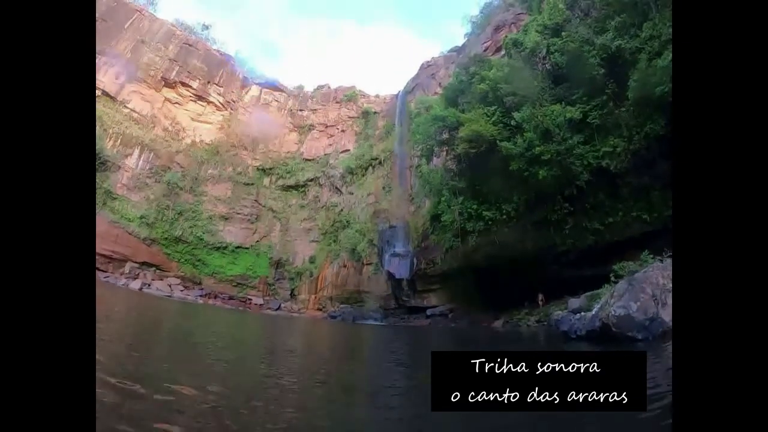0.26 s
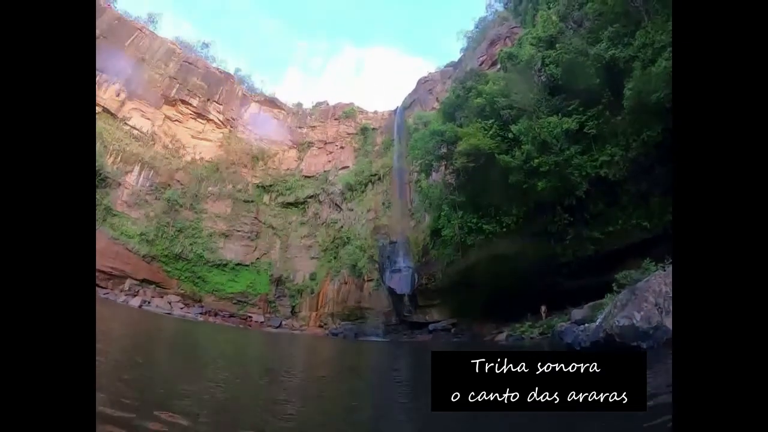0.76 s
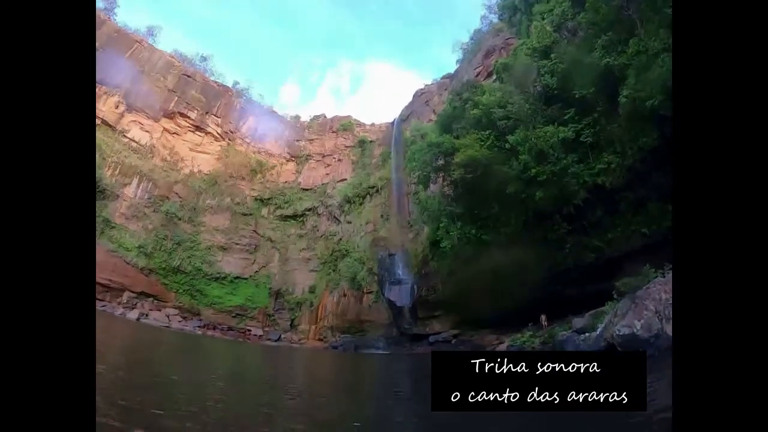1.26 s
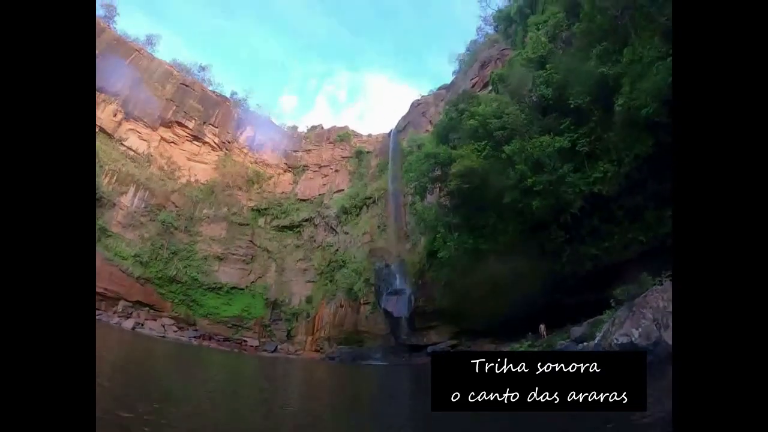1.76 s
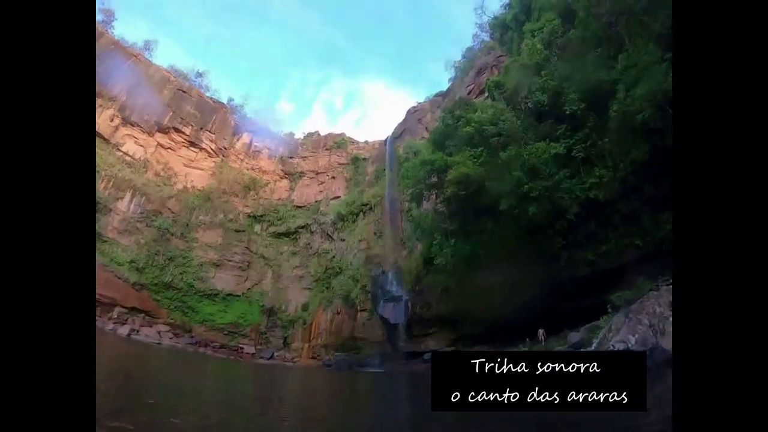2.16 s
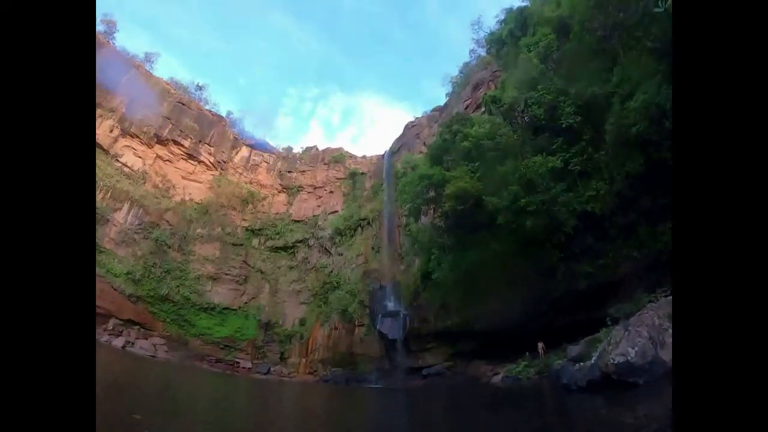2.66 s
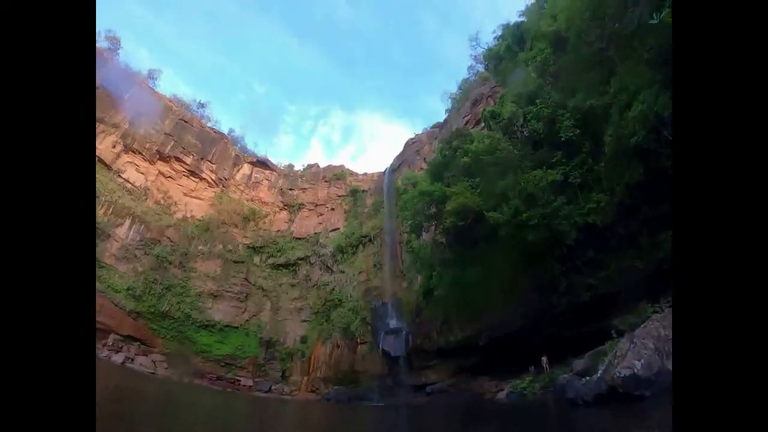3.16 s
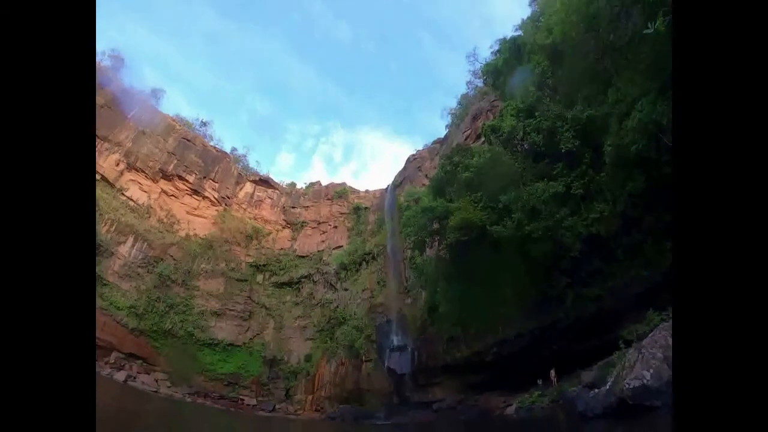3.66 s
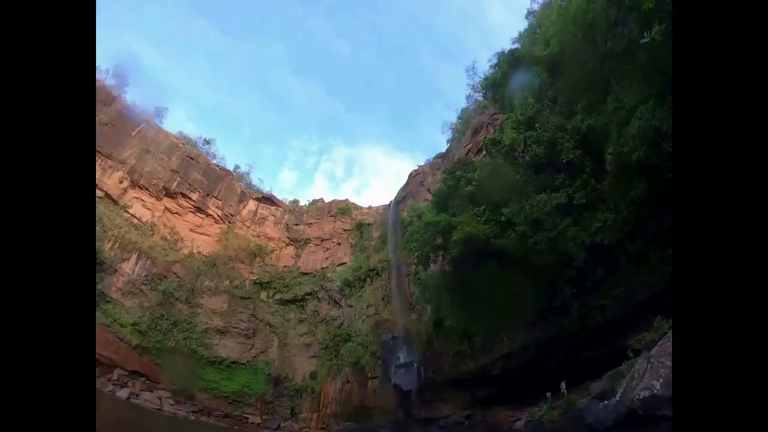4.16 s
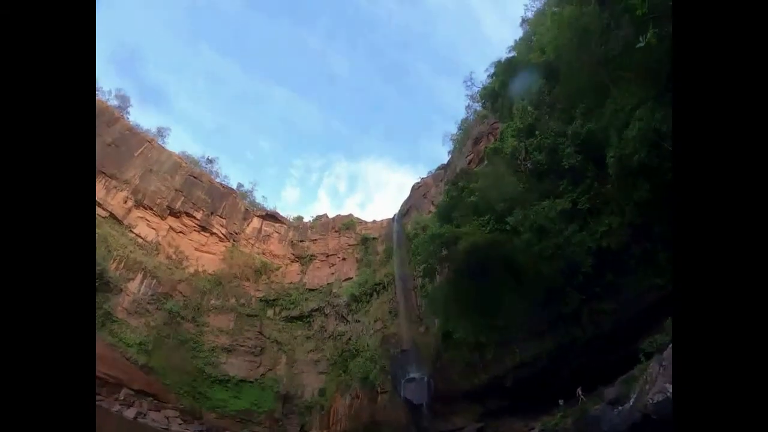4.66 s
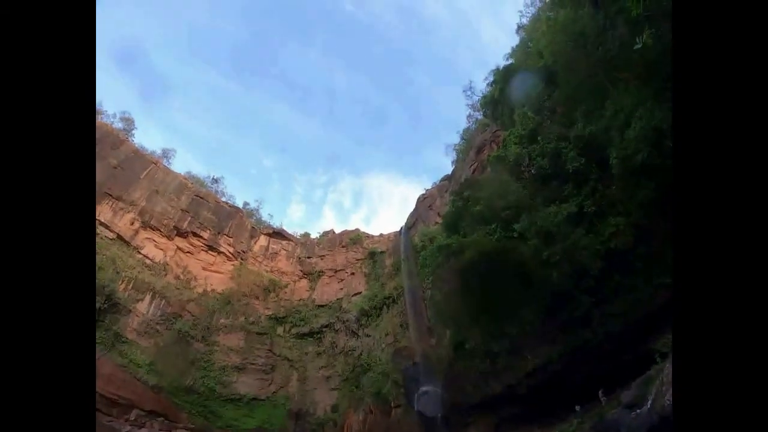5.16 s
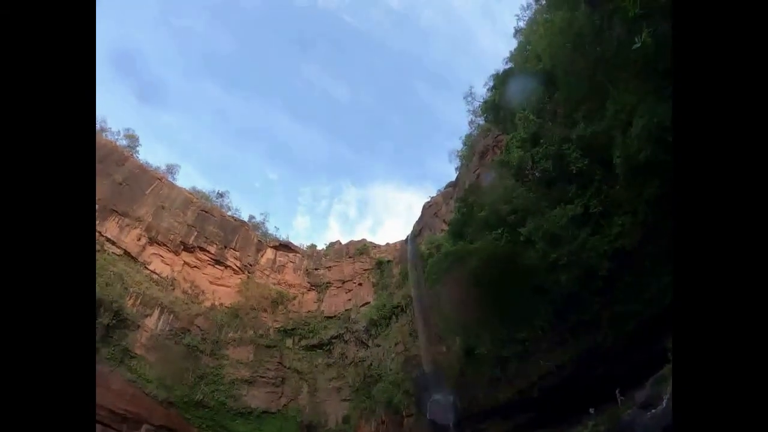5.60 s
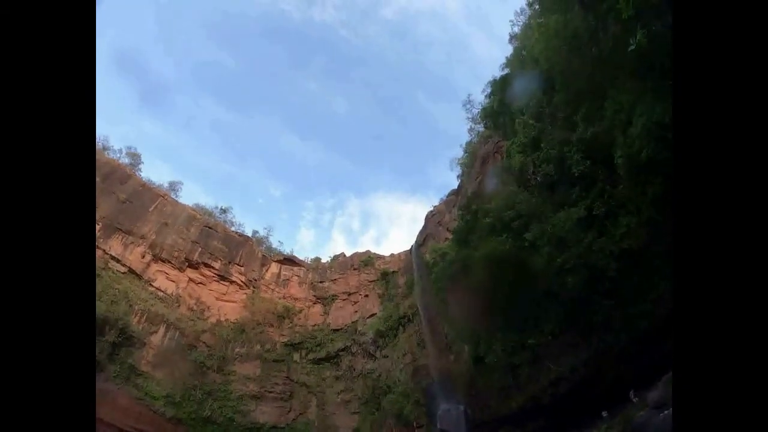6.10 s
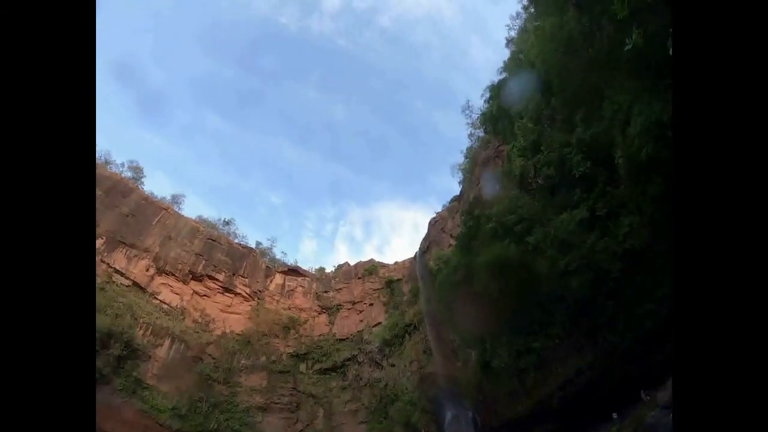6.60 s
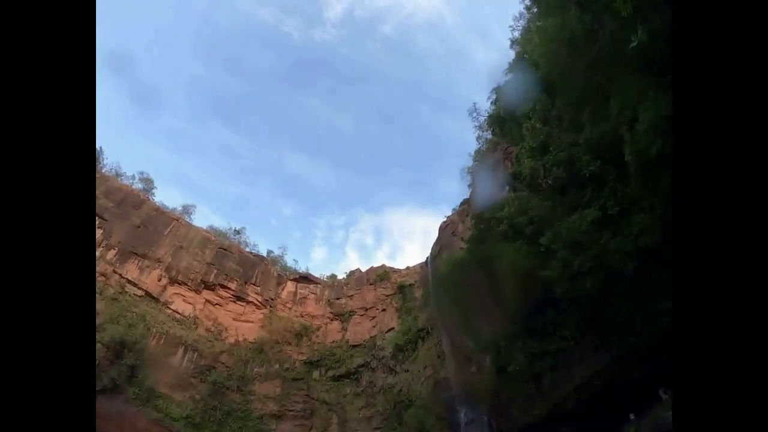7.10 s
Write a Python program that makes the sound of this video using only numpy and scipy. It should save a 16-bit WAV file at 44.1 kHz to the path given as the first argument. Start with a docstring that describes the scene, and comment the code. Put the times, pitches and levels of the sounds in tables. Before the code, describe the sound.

Close handling noise leads: irregular dull taps, rubbing and small plastic clicks, with a sudden crack just after one second. Behind it, a distant flock of macaws makes wavering chatter, brief thin whistles and three hoarse squawks, softened by short cliff echoes. A faint smooth waterfall lies underneath. Taps weaken after four seconds, leaving birds clearer, with a few low jolts near the end.

```python
"""Fingers tap on a hand-held camera case: each touch ticks on the shell and rings the case low.
Macaws squawk, a buzz through moving throat resonances, and whistle as bent, fluttering tones in a
rock amphitheatre, where noise tails echo them. Behind lie the shaped noise of a thin waterfall and its
spray, and a far flock of many overlapping calls. The hand rubs and jolts; the mount snaps once."""
import sys
import numpy as np
from scipy import signal
from scipy.fft import rfft, irfft, next_fast_len
from scipy.io import wavfile
from scipy.ndimage import uniform_filter1d

SR = 44100
rng = np.random.default_rng(int(sys.argv[2]) if len(sys.argv) > 2 else 0)


def pcm_store(signal):
    """Save signal as 16-bit PCM."""
    levels = np.round(np.clip(np.atleast_2d(signal), -1, 1) * 32767)
    wavfile.write(sys.argv[1], SR, levels.astype(np.int16).T)


N = 323694
TIME = np.arange(N) / SR  # s
OPPOSED = np.array([[1], [-1]])  # left and right in opposite polarity

# restlessness of the hand: start_s, level_db
GRIP_CURVE = [(0.0, -71), (0.26, -76.5), (0.63, -71.5), (0.82, -87), (1.06, -74), (1.29, -65), (1.61, -80),
              (1.94, -80), (2.37, -65), (2.66, -73), (2.95, -68.5), (3.68, -76), (4.23, -57.5),
              (4.62, -70.5), (5.76, -64.5), (6.09, -74), (6.64, -70.5), (7.34, -83)]


def from_db(db):
    """Decibels to gain."""
    return 10 ** (np.asarray(db) / 20)


def rms_one(x):
    """Scale to unit power."""
    return x / np.sqrt(np.mean(x ** 2) + 1e-20)


def in_time(rows, t_s=TIME):
    """Interpolate each column of a curve at the times t_s."""
    s, *columns = np.transpose(rows)
    return [np.interp(t_s, s, column) for column in columns]


def drift(rate_hz, size=N):
    """Random wander of unit spread: noise through two equal low-pass poles at rate_hz."""
    r = np.exp(-2 * np.pi * rate_hz / SR)
    run_in = int(10 * SR / rate_hz)
    noise = rng.standard_normal(size + run_in)
    return rms_one(signal.lfilter([1], [1, -2 * r, r * r], noise))[run_in:]


def coloured(points):
    """Unit-power noise with the given spectral density, falling away below its first point."""
    hz, db = np.transpose(points)
    size = next_fast_len(N, real=True)
    f = np.maximum(np.fft.rfftfreq(size, 1 / SR), 1)
    gain = from_db(np.interp(np.log(f), np.log(hz), db)) * np.minimum(f / hz[0], 1)
    return rms_one(irfft(rfft(rng.standard_normal(size)) * gain, size)[:N])


def ring(clicks, hz, t60_s):
    """Decaying resonator: a unit click starts a sine of height 1."""
    r = from_db(-60 / (t60_s * SR))
    w = 2 * np.pi * hz / SR
    return signal.lfilter([0, np.sin(w)], [1, -2 * r * np.cos(w), r * r], clicks + 1e-18)


def resonance(hz, width_hz):
    """Filter coefficients of a two-pole resonance with gain near 1 on top."""
    r = np.exp(-np.pi * width_hz / SR)
    zeros = np.array([1, 0, -1]) * (1 - r * r) / 2
    return zeros, [1, -2 * r * np.cos(2 * np.pi * hz / SR), r * r]


def resonate_twice(x, hz, width_hz):
    """Two equal resonances in series."""
    zeros, poles = resonance(hz, width_hz)
    return signal.lfilter(zeros, poles, signal.lfilter(zeros, poles, x))


def sweep(x, hz, width_hz, size=64):
    """A resonance whose centre moves, block by block."""
    state, out = np.zeros(2), np.zeros(len(x))
    for i in range(0, len(x), size):
        zeros, poles = resonance(hz[i], width_hz)
        out[i:i + size], state = signal.lfilter(zeros, poles, x[i:i + size], zi=state)
    return out


def add(out, s, x):
    """Mix x into out at time s."""
    i = max(int(s * SR), 0)
    out[..., i:i + x.shape[-1]] += x[..., :N - i]


def place(x, pan_db, lag_ms):
    """Stereo position: left is louder by pan_db and later by lag_ms."""
    t_ms = np.arange(len(x)) / SR * 1000
    left = np.interp(t_ms - lag_ms, t_ms, x)
    return np.array([left * from_db(pan_db / 2), x * from_db(-pan_db / 2)])


def cliffs(x, wet_db, build_s, t60_s=0.79):
    """Scattered rock echoes build up and die: a partly shared noise tail for each ear."""
    t = TIME[:SR]
    shape = from_db(-60 * t / t60_s) * (1 - np.exp(-t / build_s))
    echoes = shape * (rng.standard_normal((2, SR)) + 0.23 * rng.standard_normal(SR))
    tail = signal.fftconvolve(x, rms_one(echoes) / np.sqrt(SR), axes=1)[:, :N]
    return (x + from_db(wet_db) * tail) / np.sqrt(1 + from_db(2 * wet_db))


def whistle(length_s, pitches_hz, waver, flutter_db):
    """An arched note: the throat picks one overtone of a hoarse voice and leaves its neighbours faint."""
    u = np.linspace(0, 1, int(max(length_s, .01) * SR))
    # parabola through start, middle and end pitch
    arch_hz = np.polyval(np.polyfit([0, .5, 1], pitches_hz, 2), u)
    hz = arch_hz * (1 + waver * drift(194.3, len(u)))
    phase = 2 * np.pi * np.cumsum(hz) / SR
    hoarse = 1 + .15 * np.cos(phase / 4) + .25 * drift(300, len(u))
    swell = np.abs(np.sin(np.pi * u)) ** .25 * from_db(flutter_db * drift(40, len(u)))
    return rms_one(swell * hoarse * np.sin(phase))


def waterfall(level_db):
    """A smooth far wash: steady noise, part common to both ears and part opposed."""
    # spectra: pitch_hz, density_db
    wash_mid = [(300, -21), (530, -25), (855, -11.5), (1150, -20.5), (1310, -4.5), (1500, -15.5),
                (1630, -5), (1780, -9), (2400, -8.5), (2700, -1.5), (3490, -4.5), (4250, -15), (6400, -13),
                (9600, -15.5), (11500, -33), (15000, -23.5)]
    wash_side = [(180, -5), (300, -10.5), (515, -18.5), (738, -9), (1130, -16), (1670, -1), (2070, -36),
                 (3220, -0.5), (3980, -29), (5010, -2.5), (6620, -28), (7180, -23), (8600, -21.5),
                 (9960, -59), (15000, -68)]
    mid = from_db(5.5) * coloured(wash_mid)
    side = from_db(4.0) * coloured(wash_side)
    return from_db(level_db) * (mid + side * OPPOSED)


def spray():
    """Fine drops hiss at the foot of the fall, louder as the camera tilts up."""
    # spectrum: pitch_hz, density_db
    hiss_colour = [(5500, -17), (6100, -6), (6600, 2), (7300, -17), (8600, -8.5), (9300, -6), (10400, -15),
                   (11500, -27), (15000, -14.5)]
    # level before the overall gain: start_s, level_db
    hiss_level = [(0, -95), (3.8, -83), (5.2, -74), (6.2, -70.5), (7.34, -72)]
    hiss = coloured(hiss_colour) + 0.49 * coloured(hiss_colour) * OPPOSED
    return from_db(in_time(hiss_level)[0] + 8.0) * hiss


def far_flock(mean_db=-50.5, swing=1.33, count=110):
    """Many far calls overlap into a wavering band, over chatter blurred by the cliffs."""
    # blurred chatter: pitch_hz, density_db
    blur_colour = [(900, -17.5), (1300, -12), (1630, -2), (1850, -3.5), (2150, 0), (2420, -5.5),
                   (2700, 3.5), (3100, -18), (3500, -2.5), (3800, -10.5), (4150, -24), (5500, -34.5)]
    # course of the chatter: start_s, level_db (only its departure from the mean counts, times swing)
    chatter = [(0.0, -53), (0.61, -56), (0.9, -50.5), (2.02, -56), (3.64, -55), (4.0, -51), (4.25, -52.5),
               (4.97, -51.5), (5.3, -51), (6.6, -54.5), (7.01, -53.5), (7.34, -52)]
    chatter_db, = in_time(chatter)
    level_db = mean_db + swing * (chatter_db - chatter_db.mean())

    calls = np.zeros((2, N))
    for when, length, pitch, bend, side in rng.random((count, 5)):
        hz = 2100 + 1500 * pitch
        pitches_hz = hz * np.array([1 + 0.1296 * (bend - .5), 1, .97])
        note = whistle(0.0374 + 0.0976 * length, pitches_hz, waver=.012, flutter_db=6.5)
        add(calls, when * N / SR, place(note, 8 * (side - .5), lag_ms=0.33))
    calls = rms_one(cliffs(calls, wet_db=1.5, build_s=0.012))

    shared_blur = place(coloured(blur_colour), pan_db=-8.5, lag_ms=0.32)
    separate_blur = np.array([coloured(blur_colour), coloured(blur_colour)])
    blur = rms_one(shared_blur + separate_blur) * from_db(2.08 * drift(32.03))
    return from_db(level_db) * (from_db(-5.5) * blur + from_db(-8.5) * calls)


def far_cry():
    """One drawn-out call from beyond the rim: a few low harmonics that swell and fade."""
    # start_s, pitch_hz, level_db
    cry_curve = [(0, 430, -55), (.15, 424.6, -76), (.25, 433, -62.5), (.45, 431, -68), (.6, 433, -70),
                 (.75, 411, -83)]
    # multiple, level_db
    harmonics = [(2, -1.5), (3, -1.5), (4, -16)]
    hz, db = in_time(cry_curve)
    phase = 2 * np.pi * np.cumsum(hz * (1 + .018 * drift(30))) / SR
    cry = sum(from_db(db + g + 3.5 * drift(9)) * np.sin(k * phase) for k, g in harmonics)
    cry = cry * (TIME < cry_curve[-1][0])
    return cliffs(place(cry, pan_db=-6, lag_ms=0.13), wet_db=-15, build_s=0.011)


def grip(rub_db=3.5, rumble_db=-55.5, swell_db=6.5):
    """The shifting hand rubs on the case (resonant noise), rumbles the microphone and jolts it."""
    # start_s, level_db, pitch_hz
    jolt_rows = [(0.151, -41, 60), (1.078, -44, 64.5), (1.623, -45, 65), (2.625, -41, 60), (2.927, -50, 70),
                 (4.092, -39.5, 49.7), (5.936, -42, 39.3), (6.503, -41, 39.8), (6.736, -36.5, 41.6),
                 (6.828, -34, 50.5)]
    grip_db, = in_time(GRIP_CURVE)
    friction = rng.standard_normal(N) * from_db(swell_db * drift(22.22))
    rub = resonate_twice(friction, 185, 53) + from_db(-15.0) * resonate_twice(friction, 386, 86)

    # pitch_hz, density_db
    rumble_colour = [(20, 4.0), (40, -1.0), (70, -13.0), (110, -49), (400, -64), (2000, -102)]
    rumble = coloured(rumble_colour) * from_db(2.75 * drift(6.2))

    jolts = np.zeros(N)
    t = TIME[:SR // 5]
    for s, db, hz in jolt_rows:
        age = t / 0.011
        add(jolts, s, from_db(db) * age * np.exp(1 - age) * np.sin(2 * np.pi * hz * t))
    hand = from_db(grip_db + rub_db) * rms_one(rub) + from_db(rumble_db) * rumble + jolts
    return place(hand, pan_db=2.0, lag_ms=0)


def snap():
    """The mount slips and snaps: noise bursts that die in milliseconds, then a short ring."""
    # start_s, level_db, decay_s
    slips = [(1.308, -41.5, 0.0086), (1.3156, -27.5, 0.0089), (1.3184, -29, 0.0041), (1.323, -15.5, 0.0014),
             (1.3256, -34, 0.0058)]
    # pitch_hz, density_db
    crack_colour = [(300, -37), (1000, -13.5), (1500, -15), (2050, 0.5), (2600, -9), (3600, -1.5),
                    (4400, -18.5), (6300, -9.5), (7300, -30), (8600, -11.5), (10200, -20.5), (11000, -48),
                    (15000, -20)]
    force = sum(from_db(db) * (TIME >= s) * np.exp(-np.abs(TIME - s) / decay_s)
                for s, db, decay_s in slips)
    separate = np.array([coloured(crack_colour), coloured(crack_colour)])
    crack = force * (coloured(crack_colour) + 0.5 * separate)
    stop = np.zeros(N)
    add(stop, 1.329, from_db([-33]))
    return (crack + ring(stop, hz=1040, t60_s=0.057)) * from_db([[-1.5], [1.5]])


def light_touches(per_s=18, over_grip_db=15.5, spread_db=2.5, tick_db=-34, upper_db=-21):
    """Fingertips shift at uneven intervals, as strong as the hand is restless; rows like firm taps."""
    chance = rng.random((int(per_s * N / SR), 5))
    s = (np.arange(len(chance)) + chance[:, 0]) / per_s
    scatter_db = spread_db * np.sqrt(12) * (chance[:, 1:4].T - .5)
    thud_db = in_time(GRIP_CURVE, s)[0] + over_grip_db + scatter_db[0]
    # tick and upper mode are relative to the thud
    ticks_db = thud_db + tick_db + scatter_db[1]
    uppers_db = thud_db + upper_db + scatter_db[2]
    ring_hz = np.interp(chance[:, 4], [0, 1], [162.4, 216])
    t60_s = np.full(len(s), 0.1)
    return list(zip(s, thud_db, ticks_db, uppers_db, ring_hz, t60_s))


def taps(lead_s=0.0015, crack_s=0.003, low_cut_hz=138, grit=0.13, soft_db=-33):
    """Each touch ticks on the shell, then the case rings low, pitch and damping set by the grip."""
    # start_s, thud_db, tick_db, upper_mode_db, ring_hz, ring_t60_s
    firm_taps = [(.002, -31.5, -56.5, -47, 200, 0.14), (.017, -28.5, -66, -31, 193, 0.08),
                 (.147, -25.5, -54, -24.5, 186, 0.043), (0.416, -25.5, -55.5, -65, 196, 0.084),
                 (.533, -31.5, -56.5, -29.5, 206, 0.048), (.676, -37, -67.5, -55.5, 188, 0.087),
                 (0.745, -31.5, -68, -37, 198, 0.077), (1.074, -25, -58, -23, 208, .036),
                 (1.152, -44, -72, -42, 200, 0.036), (1.244, -29, -67, -42, 197, 0.06),
                 (1.412, -27, -56, -36, 200, 0.054), (1.511, -32.5, -64, -37, 192, 0.083),
                 (1.619, -27, -55.5, -29, 180, 0.097), (1.858, -24.5, -53.5, -34, 204, 0.089),
                 (1.984, -33, -60, -39, 193, 0.091), (2.121, -31, -52, -31, 202, 0.13),
                 (2.156, -34, -65, -40, 182, 0.045), (2.216, -41.5, -77, -68, 191, 0.052),
                 (2.29, -43, -73, -38, 200, .04), (2.307, -28, -67, -36, 195, 0.044),
                 (2.341, -35, -74, -38, 198, 0.18), (2.379, -36, -75, -41, 176, 0.074),
                 (2.481, -38.5, -66, -46, 210, 0.04), (2.587, -31, -57, -35, 185, .065),
                 (2.642, -23.5, -61, -30, 198, 0.046), (2.697, -35, -74, -44, 186, 0.059),
                 (2.801, -34, -78, -50, 202, 0.048), (2.836, -25.5, -55, -33, 201, 0.052),
                 (2.902, -41, -68, -41, 205, 0.23), (2.939, -26.5, -65, -40, 184, 0.081),
                 (2.961, -34, -64.5, -45, 207, 0.083), (3.043, -34.5, -65.5, -44.5, 194, 0.077),
                 (3.075, -44, -73, -41, 180, .05), (3.145, -42, -71, -45, 200, 0.074),
                 (3.281, -27.5, -59, -29, 204, 0.072), (3.37, -37.5, -73, -45.5, 196, 0.15),
                 (3.44, -36.5, -77, -49, 178, 0.064), (3.505, -30.5, -58.5, -34.5, 212, 0.058),
                 (3.662, -39.5, -67, -45, 193, 0.097), (3.74, -37.5, -62, -42, 199, 0.068),
                 (3.871, -38.5, -83, -60, 182, 0.12), (3.994, -37, -62, -52, 189, 0.16),
                 (4.025, -40, -66, -42.5, 199, 0.14), (4.121, -31.5, -68, -34, 195, 0.09),
                 (4.182, -29.5, -71, -40.5, 190, 0.065), (4.22, -36, -80, -49, 174, 0.061),
                 (4.287, -37.5, -69, -43, 204, 0.043), (4.42, -37.5, -84, -63, 178, 0.12),
                 (4.805, -43.5, -82, -62, 192, 0.088), (4.894, -42, -75, -61, 195, 0.18),
                 (5.245, -39.5, -81, -52, 194, .07), (5.355, -44, -70.5, -46, 190, 0.14),
                 (5.6, -43, -77, -46, 172, 0.2), (5.643, -41.5, -74, -46.5, 200, 0.075),
                 (5.722, -44.5, -80, -55, 192, 0.11), (5.756, -44.5, -78, -52, 192, 0.091),
                 (5.849, -50, -74, -43, 182, .06), (5.929, -47, -80, -47, 192, 0.081),
                 (6.498, -44.5, -70, -59, 195, 0.21), (6.606, -44.5, -76, -54, 189, .07),
                 (6.676, -43, -68, -57, 193, 0.11), (6.916, -43, -82, -64, 189, 0.064),
                 (7.3, -44, -79, -54, 191, 0.082)]
    # shell modes before spot and damping: pitch_hz, level_db, t60_s
    tick_modes = [(427, -7, 0.091), (640, -1, 0.066), (735, 2, 0.069), (867, -3.5, 0.086), (1034, -1, 0.06),
                  (1278, 0, 0.056), (1638, 10, 0.014), (2050, 2.5, 0.04), (3450, 8, 0.01)]
    hum_hz, hum_db, hum_t60_s = 201.6, -16.5, 0.15  # faint low ring of the case left free
    upper_hz, upper_t60_s = 327, 0.033  # upper mode of the case, before detuning
    slip_db, slip_s = -10.5, 0.0064  # slide of the landing finger at soft_db

    low, shell = np.zeros((2, N))
    t = TIME[:SR // 5]
    for s, thud_db, tick_db, upper_db, hz, t60_s in firm_taps + light_touches():
        detune = np.exp(rng.normal(0, .12))
        # lighter touches are softer and slide more
        touch_s = np.clip(0.00021 * from_db((soft_db - thud_db) * .5), .0003, .0006)
        slide_gain = from_db(min(slip_db + (soft_db - thud_db), -5))
        push = t * np.exp(-t / touch_s)
        slide = rng.standard_normal(len(t)) * t * np.exp(-t / slip_s)
        push = push / push.sum() + slide_gain * slide / np.linalg.norm(slide)

        thud = ring(push, hz, t60_s) + from_db(hum_db) * ring(push, hum_hz, hum_t60_s)
        upper = ring(push, upper_hz * detune, upper_t60_s)
        add(low, s + lead_s, from_db(thud_db) * thud + from_db(upper_db) * upper)

        crack = grit * rng.standard_normal(len(t)) * np.exp(-t / crack_s)
        tick = from_db(tick_db) * (crack + (t == 0))
        # each spot on the shell favours other modes, and the finger damps them more or less
        spot_db = rng.normal(0, 2, len(tick_modes))
        damping = rng.uniform(.6, 1)
        modes = sum((-1) ** k * from_db(db + spot_db[k]) * ring(tick, f, decay_s * damping)
                    for k, (f, db, decay_s) in enumerate(tick_modes))
        add(shell, s, modes)
    low = signal.sosfilt(signal.butter(4, low_cut_hz, "high", fs=SR, output="sos"), low + 1e-18)
    # the shell flexes the two microphone ports in opposite directions
    flex = from_db(8.0) * shell * OPPOSED
    common = from_db(4.0) * place(shell, pan_db=5.5, lag_ms=0.073)
    return place(low, pan_db=-2.5, lag_ms=0) + flex + common


def tap_clicks(width_hz=750, decay_s=0.0026):
    """The short gritty click of some taps: resonant noise that dies in milliseconds."""
    # start_s, level_db, pitch_hz
    click_rows = [(0.147, -31, 3740), (.417, -40, 3700), (.534, -36, 3660), (1.075, -32.5, 3580),
                  (1.412, -29, 1540), (1.62, -38.5, 3420), (1.6202, -26, 595), (1.858, -36.5, 3470),
                  (1.986, -43, 3840), (2.104, -37, 1430), (2.123, -40, 2900), (2.838, -39, 3120),
                  (3.507, -39, 940)]
    out = np.zeros(N)
    t = TIME[:SR // 20]
    for s, db, hz in click_rows:
        grit = rms_one(resonate_twice(rng.standard_normal(len(t)), hz, width_hz))
        add(out, s, from_db(db) * grit * np.exp(-t / decay_s) * np.minimum(t / .0004, 1))
    out = signal.sosfilt(signal.butter(6, 4200, fs=SR, output="sos"), out)
    return place(from_db(-6.5) * out, pan_db=-6.0, lag_ms=0)


def high_cries():
    """Brief hoarse squeals: whistles with an unsteady pitch."""
    # start_s, length_s, start_hz, end_hz, level_db
    squeals = [(.612, 0.028, 4750, 4600, -61), (.662, .025, 2535, 2650, -52),
               (4.215, 0.09, 5000, 4140, -64), (5.155, 0.023, 4500, 5000, -61),
               (5.155, .02, 3720, 3930, -58), (5.2, 0.047, 3850, 3850, -62), (5.205, .04, 5000, 4900, -66)]
    out = np.zeros((2, N))
    for s, length_s, start_hz, end_hz, db in squeals:
        pitches_hz = (start_hz, (start_hz + end_hz) / 2, end_hz)
        note = whistle(length_s, pitches_hz, waver=.035, flutter_db=3)
        add(out, s, place(from_db(db) * note, pan_db=-10.0, lag_ms=0.335))
    return cliffs(out, wet_db=-15, build_s=0.027)


def whistles(sag_share=0.49, bow_share=0.202, glide_pan_db=-8):
    """Thin contact calls from the cliff: arches scoop and sag, glides bow upward as they fall or rise."""
    # start_s, length_s, middle_hz, scoop_share (of the pitch), level_db, left_right_db
    arches = [(0.869, 0.073, 3670, 0.044, -54, 5), (0.875, 0.08, 4620, .01, -63, -15),
              (0.966, .1, 4580, -0.011, -56.5, -11), (1.04, 0.2, 2836, .02, -60, 1),
              (1.113, 0.078, 3560, 0.039, -50, -3), (2.16, 0.13, 3413, 0.0012, -46.5, 2),
              (2.28, 0.094, 3410, 0.00035, -59, 0), (2.578, .14, 3410, 0.0102, -53.5, 2),
              (2.902, 0.039, 2564, 0.033, -54, 0), (2.945, 0.053, 3510, 0.013, -61, -1),
              (2.94, 0.098, 2830, 0.028, -53, 3), (3.11, 0.061, 2624, 0.0029, -51, -1),
              (3.372, 0.081, 3470, .03, -56, -1), (3.54, .066, 2617, 0.006, -54, 3),
              (4.103, 0.072, 2870, 0.0031, -50.5, -9), (4.25, 0.058, 3750, 0.056, -61, -8),
              (4.426, 0.048, 2860, 0.012, -49, -8), (4.71, 0.088, 2860, 0.012, -53, -14),
              (4.971, 0.08, 3100, 0.016, -54.5, 7), (5.315, 0.098, 3010, 0.061, -49, 5),
              (5.511, 0.022, 2766, 0.025, -48, 5), (5.718, 0.093, 2900, .06, -47, 4),
              (5.854, 0.085, 2940, 0.026, -52, -1), (6.102, 0.14, 2884, 0.06, -49, 0.5),
              (6.26, .15, 2830, .015, -56.5, -2), (5.62, .12, 2190, 0.017, -56, -2),
              (6.483, .15, 1950, -0.0052, -59.5, -7), (6.697, 0.047, 3490, 0.028, -54, -2),
              (6.868, 0.048, 2800, 0.014, -45.5, -3), (7.104, 0.046, 3690, 0.027, -50.5, -6)]
    # glides: start_s, length_s, start_hz, end_hz, level_db
    falls = [(0, 0.041, 2665, 2470, -50.5), (0.17, 0.023, 2620, 2530, -50), (.29, 0.03, 2630, 2410, -54.5),
             (0.336, 0.023, 2640, 2450, -51.5), (1.227, .05, 3480, 2600, -54.5),
             (1.387, 0.028, 3100, 2900, -56), (2.44, .035, 1830, 1810, -55),
             (5.285, 0.029, 2680, 2450, -51.5), (0.509, .028, 2620, 2400, -52.5),
             (.573, 0.042, 2975, 2720, -53.5), (0.921, 0.026, 3570, 3410, -50),
             (2.567, .03, 3960, 3570, -53.5), (2.608, 0.028, 3350, 2890, -52.5),
             (3.349, 0.024, 3760, 3410, -52), (4.37, .02, 2900, 2650, -53.5),
             (4.298, 0.05, 3780, 3150, -57), (4.49, 0.016, 3200, 2850, -51),
             (4.988, 0.036, 2790, 2535, -50.5), (5.097, 0.018, 1690, 1600, -45.5),
             (6.75, 0.044, 3500, 3160, -51.5), (6.815, 0.049, 2620, 2150, -53.5),
             (.87, 0.029, 2600, 1960, -51), (.872, .028, 1520, 1420, -51), (4.85, 0.096, 2650, 2090, -54.5),
             (5.775, 0.022, 2780, 2680, -53), (6.978, 0.052, 3400, 2680, -51),
             (7.092, 0.052, 2820, 2650, -53), (7.155, 0.06, 3630, 3200, -51), (7.209, .05, 3526, 3140, -53),
             (7.237, .034, 2295, 1890, -49.5)]
    rises = [(2.13, 0.037, 3290, 3390, -54), (3.465, 0.061, 2290, 2360, -56),
             (3.573, 0.026, 3410, 3730, -53.5), (3.606, .04, 3740, 3900, -59)]
    notes = []
    for s, length_s, hz, scoop, db, pan_db in arches:
        pitches_hz = (hz * (1 - scoop), hz, hz * (1 - sag_share * scoop))
        notes.append((s, length_s, pitches_hz, db, pan_db))
    for s, length_s, start_hz, end_hz, db in falls + rises:
        middle_hz = (start_hz + end_hz) / 2 + bow_share * abs(start_hz - end_hz)
        notes.append((s, length_s, (start_hz, middle_hz, end_hz), db, glide_pan_db))

    out = np.zeros((2, N))
    for s, length_s, pitches_hz, db, pan_db in notes:
        note = from_db(db) * whistle(length_s, pitches_hz, waver=0.0039, flutter_db=2.0)
        add(out, s, place(note, pan_db, lag_ms=0.32))
    return cliffs(out, wet_db=-8.5, build_s=0.06)


def squawks(beak_width_hz=520, rattle_hz=80, rattle_db=3.4):
    """The syrinx buzzes through a moving throat; forced, it wanders, alternates cycles and rasps."""
    # one table per squawk: start_s, pitch_hz, level_db, roughness, beak_hz, throat_factor
    calls = [
        [(.665, 490.5, -55, 0.55, 2560, 0.99), (.703, 502.5, -46, .55, 2950, 1.06),
         (.755, 533.4, -41.5, 0.56, 2980, 1), (.785, 536, -43.5, .7, 2950, 1.035),
         (.825, 505, -46, 0.72, 2750, 1), (.86, 512.6, -43, 0.83, 2500, 0.99),
         (.895, 495, -48, 0.59, 2250, 1.06), (.91, 515, -51, .6, 2200, 1.02), (1.05, 498, -60, .6, 2200, 0.98)],
        [(3.66, 858, -57, 0.17, 3450, 1.04), (3.705, 904, -44, 0.21, 3600, 1),
         (3.732, 1040, -40, 1.03, 3900, 1), (3.747, 1110, -44, 0.66, 3930, 1),
         (3.754, 1130, -32.5, .12, 3500, 1.13), (3.763, 1129, -41, 0.56, 4000, 1.11),
         (3.772, 1135, -32, .1, 3500, 1.1), (3.785, 1132, -40, 0.86, 3900, 1.01),
         (3.805, 1040, -38.5, 1.12, 4500, 0.89), (3.83, 1003, -40.5, 1.04, 4600, 1.03),
         (3.885, 1008, -42, 1, 4630, 0.91), (3.933, 1066, -41, 0.75, 4840, 0.97),
         (3.943, 1140, -37, .15, 5500, 1.09), (3.957, 1130, -57, .3, 6100, 1.14)],
        [(5.172, 675, -46, .3, 3900, 1), (5.19, 699, -43.5, 0.28, 3900, 1), (5.24, 732, -39.5, 0.6, 3400, 1.08),
         (5.275, 714, -41.5, 0.48, 3200, 0.98), (5.31, 715, -66, .9, 3200, 1)],
    ]
    # throat resonances per squawk, before throat_factor: pitch_hz, width_hz, level_db
    throats = [
        [(1000, 230, -16.5), (1520, 240, -13), (2047, 270, 6.5), (2650, 280, -4), (2950, 330, -6),
         (3480, 430, -5.5), (4070, 320, -13), (4600, 260, -6)],
        [(1056, 130, -12), (1600, 150, 1), (2025, 420, 6), (2560, 360, -0.5), (2900, 200, -2),
         (3430, 350, -7.5), (3960, 330, -11), (4650, 200, -7.5)],
        [(1040, 230, -9), (1600, 260, -7), (2137, 210, 11.5), (2680, 230, -3), (3200, 390, -16),
         (3840, 270, -19)],
    ]
    # beak resonance per squawk: level_db
    beak_levels = [-9, -6.5, -17]

    out = np.zeros(N)
    for call, throat, beak_db in zip(calls, throats, beak_levels):
        t = np.arange(call[0][0], call[-1][0], 1 / SR)
        size = len(t)
        hz, db, rough, beak_hz, stretch = in_time(call, t)
        wander = .025 * drift(60, size) + .03 * drift(280, size)
        phase = 2 * np.pi * np.cumsum(hz * (1 + rough * wander)) / SR
        buzz = rms_one(sum(np.cos(k * phase + k * k) * from_db(3.5 * rough * drift(70, size))
                           for k in range(1, 10)))
        # strong and weak cycles put lines between the harmonics
        buzz = buzz * (1 + 1.2 * rough * np.cos(phase / 2 + drift(60, size)))
        # noise pulses with the pitch
        buzz = buzz + .9 * rough * (1 + np.cos(phase)) * rng.standard_normal(size)

        moving = stretch * (1 + .02 * rough * drift(50, size))
        resonances = [(f * moving, width_hz, g) for f, width_hz, g in throat]
        resonances.append((beak_hz, beak_width_hz, beak_db))
        voice = sum(from_db(g) * sweep(sweep(buzz, f, width_hz), f, width_hz)
                    for f, width_hz, g in resonances)
        top_hz = np.max(beak_hz) * .5 + 2400
        voice = signal.sosfilt(signal.butter(4, top_hz, fs=SR, output="sos"), voice)
        # even out the level before the call's own level and rattle
        voice /= np.sqrt(uniform_filter1d(voice ** 2, size=400) + 1e-12)

        beat = 2 * np.pi * np.cumsum(rattle_hz * (1 + .3 * drift(50, size))) / SR
        rattle = from_db(rattle_db * np.minimum(2 * rough, 1) * (np.cos(beat) + 0.5))
        add(out, t[0], voice * rattle * from_db(db))

    # the far wall returns a dull copy
    heard = out.copy()
    echo = signal.lfilter(*resonance(1870, 600), out)
    add(heard, .28, from_db(-18) * echo)
    return cliffs(from_db(1.5) * place(heard, pan_db=-5.0, lag_ms=0.3), wet_db=-10, build_s=.02)


def scene():
    """Birds and water far off, the hand close by."""
    background = waterfall(level_db=-62) + spray() + far_flock() + far_cry()
    hand = grip() + snap() + taps() + tap_clicks()
    birds = high_cries() + whistles() + squawks()
    return background + hand + birds


def record(dry):
    """Peaks are rounded, the microphone dulls above 11.8 kHz, the top is cut at 15 kHz."""
    rounded = .38 * np.tanh(dry / .38)
    dull = signal.sosfilt(signal.butter(6, 11800, fs=SR, output="sos"), rounded)
    return signal.sosfilt(signal.ellip(10, .2, 80, 15000, fs=SR, output="sos"), dull)


dry = scene()
out = record(dry)
pcm_store(out)
```